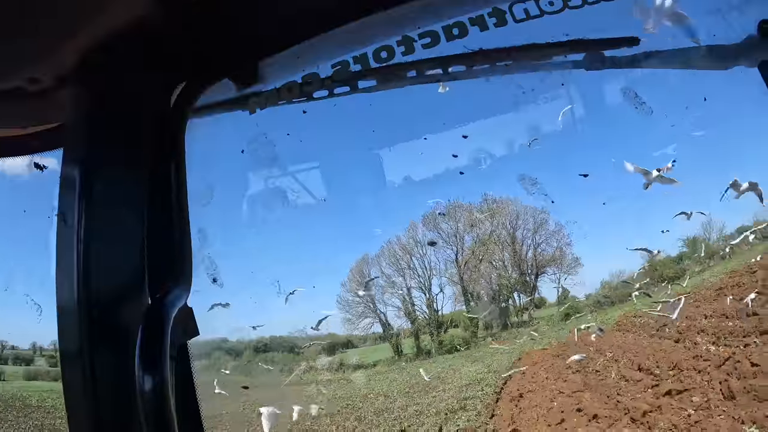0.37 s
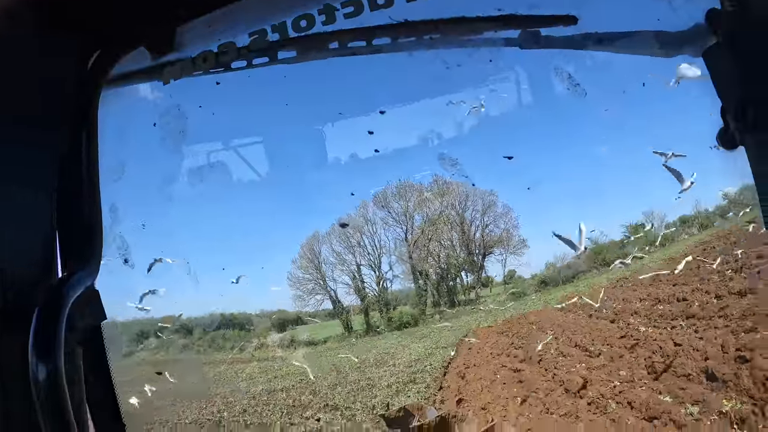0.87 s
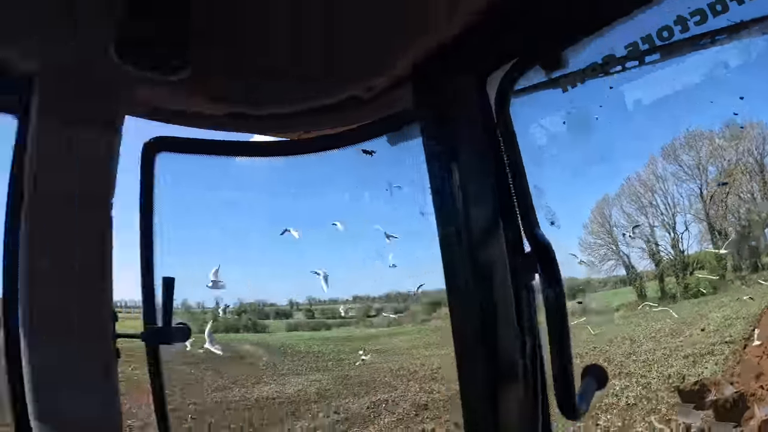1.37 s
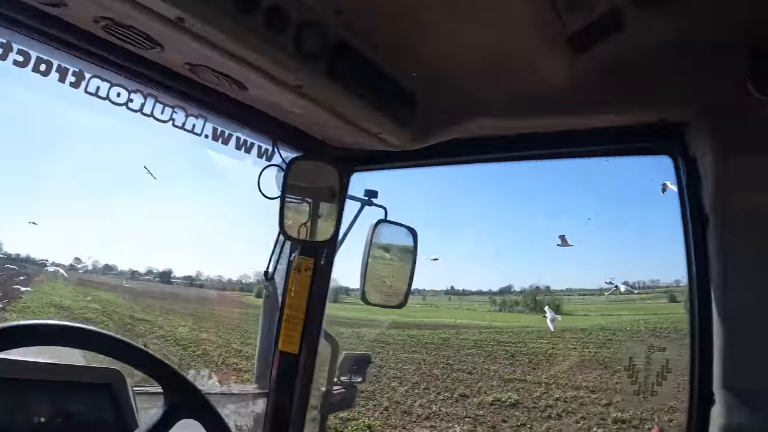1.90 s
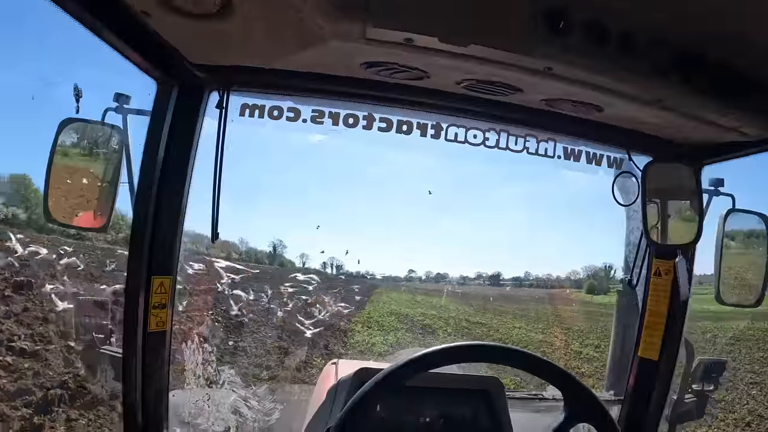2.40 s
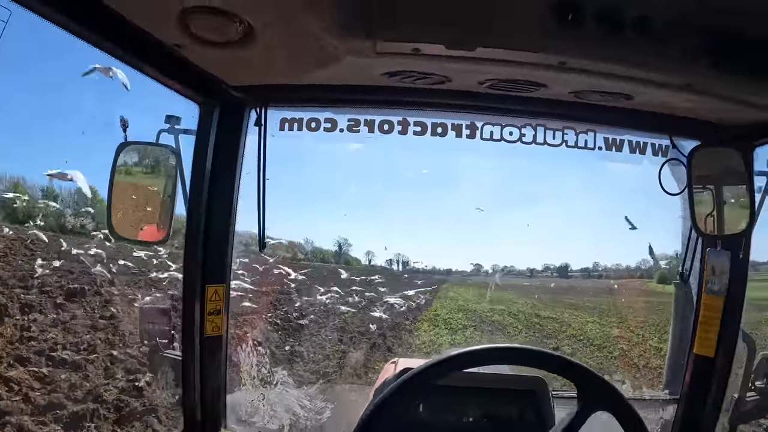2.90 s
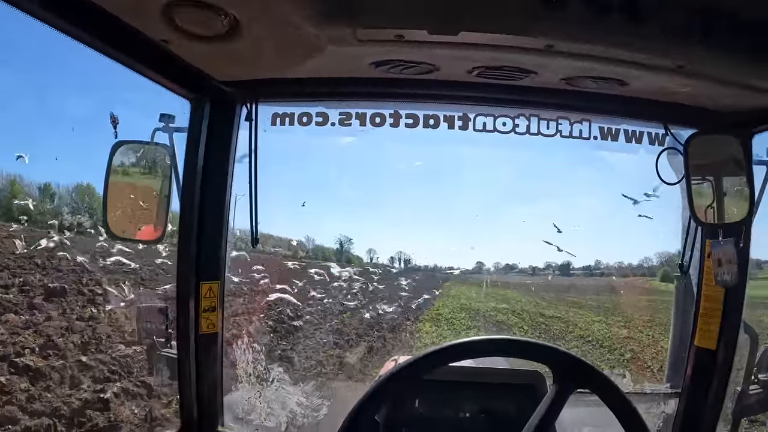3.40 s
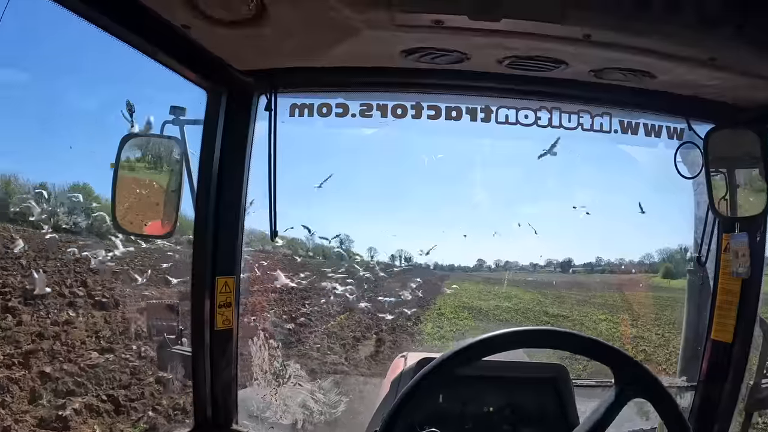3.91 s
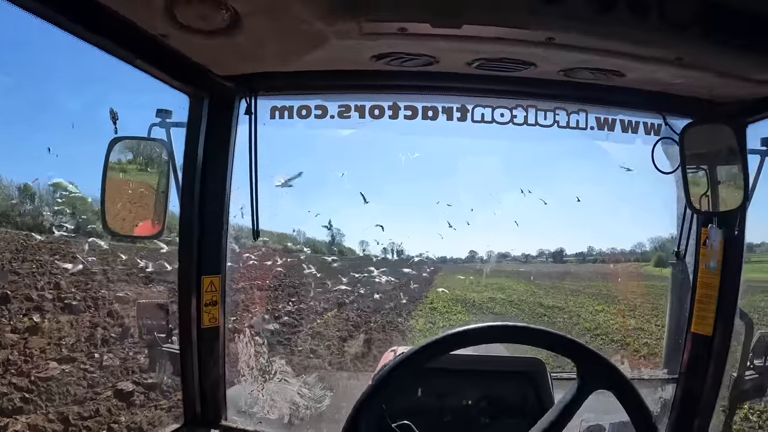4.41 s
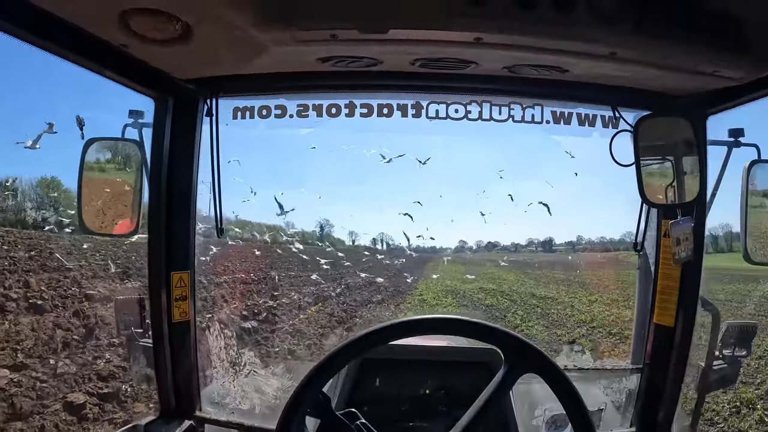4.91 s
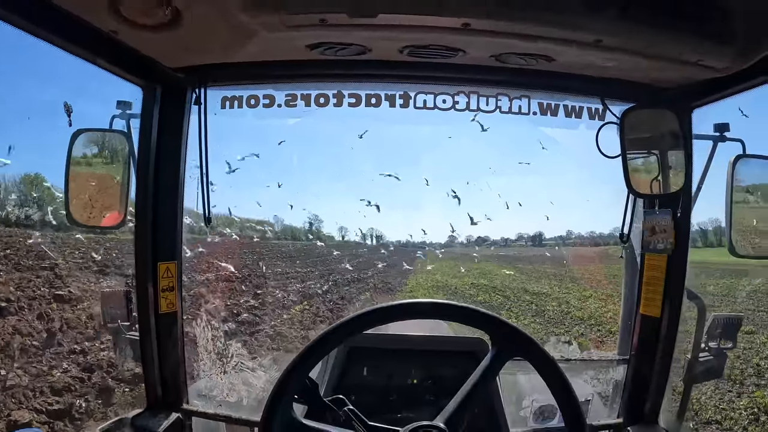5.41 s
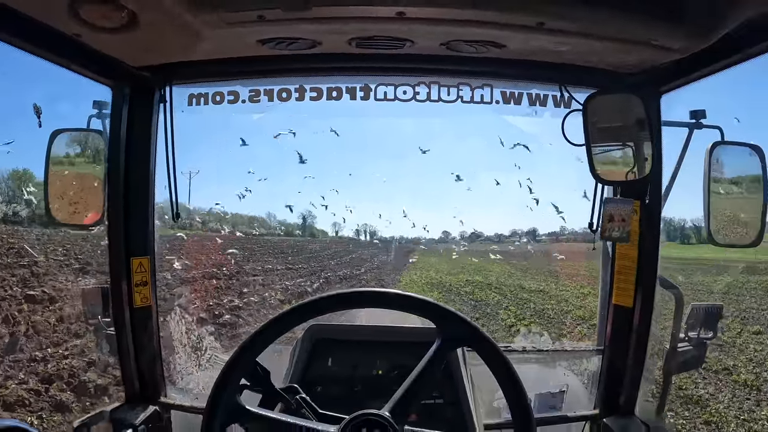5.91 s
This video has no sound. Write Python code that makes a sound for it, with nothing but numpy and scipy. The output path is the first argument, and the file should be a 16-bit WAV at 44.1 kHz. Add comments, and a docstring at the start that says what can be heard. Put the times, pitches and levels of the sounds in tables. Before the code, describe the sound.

A hand-held microphone in a vibrating tractor cab hears a continuous low engine hum from a six-cylinder diesel, thick with rough overtones. Facing rear first, it catches more mechanical clatter, whine and thin high hiss; turned forward, the treble and midrange soften while the boom stays. Irregular ticks of loose fittings and low jolting rumble over soil continue, and a short rough squeak ends the passage.

```python
"""Diesel tractor cab, ploughing.

A hand-held stereo microphone turns from the rear window to the windscreen of a six-cylinder tractor.
Sines locked to the engine cycle give the ruling firing boom, the engine orders and the gear and pump
whines; shaped noise gives the broad roar and a thin high hiss. Short notes make the clatter, cracks
with ringing modes the rattles of loose fittings, and a rough stack of sines one short squeak."""
import sys
import numpy as np
from scipy import signal
from scipy.fft import rfft, irfft
from scipy.io import wavfile
from scipy.ndimage import uniform_filter1d

SR = 44100
rng = np.random.default_rng(int(sys.argv[2]) if len(sys.argv) > 2 else 0)


def rack_gain(trim_db):
    """Turn a fader trim in dB into the linear factor to multiply a signal by."""
    fader = np.asarray(trim_db, float)
    return 10 ** (fader / 20)


def store_wav(level_fs):
    """Save 16-bit WAV to argv[1]."""
    pcm = np.round(np.clip(np.atleast_2d(level_fs), -1, 1) * 32767)
    wavfile.write(sys.argv[1], SR, pcm.T.astype(np.int16))


N = 266672
T = np.arange(N) / SR
FIRING_ORDER = 6  # firings per four-stroke cycle


def evened(x):
    """Scales to rms 1."""
    return x / np.sqrt(np.mean(x ** 2) + 1e-20)


def curve(rows, t=T):
    """Every column of a time table, read at times t."""
    s, *columns = np.transpose(rows)
    return [np.interp(t, s, c) for c in columns]


def read(rows, hz):
    """Every column of a frequency table, read on a log axis."""
    f, *columns = np.transpose(rows)
    return [np.interp(np.log(hz + 1), np.log(f + 1), c) for c in columns]


def wander(top_hz):
    """Chance of rms 1: sixteen sines up to top_hz, sampled every 2 ms."""
    s = np.arange(0, T[-1] + .01, .002)
    f = np.geomspace(top_hz / 20, top_hz, num=16)[:, None]
    sines = np.sin(2 * np.pi * (f * s + rng.random(f.shape)))
    return np.interp(T, s, evened(sines.sum(0)))


def wavers(rows):
    """Smooth swells and dips in dB; each row: centre in seconds, length in seconds, change in dB."""
    return sum(db * np.exp(-(2 * (T - s) / length) ** 2) for s, length, db in rows)


# Microphone turn. Each row: time in seconds, facing (0 rear window, 1 windscreen).
FACING = [(0, 0.031), (.6, 0.051), (1.2, 0.04), (1.5, 0.29), (1.8, 0.72), (2.1, 0.7), (2.6, 0.92),
          (3.7, 0.92), (4.2, 0.89), (5.4, 0.98), (6.05, 0.79)]


def facing(t=T):
    """Microphone direction, 0 rear to 1 front."""
    return curve(FACING, t)[0]


def turned(rear, front, share):
    """Blends a rear and a front value by the share of the turn made."""
    return rear + share * (front - rear)


# The governor hunts as the plough bites. Each row: time in seconds, engine speed in rpm, firing boom in dB.
DRIVE = [(0.0, 1462, -15.4), (0.42, 1486, -15.3), (0.72, 1447, -15.3), (1.22, 1471, -15.4),
         (1.5, 1449, -16.2), (1.78, 1478, -16.4), (2.1, 1444, -14.4), (2.45, 1452, -14.8),
         (2.7, 1473, -14.8), (2.9, 1468, -14.8), (3.17, 1488, -15.2), (3.45, 1462, -14.7),
         (3.72, 1455, -15.0), (3.9, 1466, -14.7), (4.1, 1463, -14.3), (4.7, 1497, -15.0),
         (5.1, 1469, -15.4), (5.4, 1496, -15.1), (5.6, 1484, -15.3), (5.82, 1499, -15.8),
         (6.05, 1482, -15.9)]


def cycle_count():
    """Four-stroke cycles completed: one for two turns of the crank."""
    rpm, _ = curve(DRIVE)
    return np.cumsum(rpm / 120) / SR


def overspeed_percent():
    """Engine speed above the usual one."""
    usual_rpm = 1470
    return 100 * (curve(DRIVE)[0] / usual_rpm - 1)


# The two microphone ports. Each row: frequency in Hz, likeness, left-right level in dB, left lead in radians.
PORTS = [(60, .996, .4, 0), (300, .95, .8, -.05), (550, .76, 1.7, -.22), (1100, .8, 1.8, -.34),
         (2200, .76, 1.6, -.52), (4500, .66, .6, -.38), (7500, .56, 1.9, -.02), (10000, .55, 1.1, -.02)]


def place(x, hz):
    """Pans a narrow sound near hz by the level difference of the ports."""
    _, pan_db, _ = read(PORTS, hz)
    return x * rack_gain([[pan_db / 2], [-pan_db / 2]])


def tone(cycles, order, db, flutter_db, slip_rad, chance_hz):
    """A sine locked to the engine cycle, its level and phase shaken by chance."""
    phase = 2 * np.pi * (order * cycles + rng.random()) + slip_rad * wander(chance_hz)
    x = np.sqrt(2) * rack_gain(db + flutter_db * wander(chance_hz)) * np.sin(phase)
    return place(x, order * cycles[-1] / T[-1])


# Roar colour. Each row: frequency in Hz, relative density in dB facing rear, facing front.
ROAR_COLOUR = [(20.1, -45, -40.5), (46, -52.5, -55.5), (90, -59.5, -54), (161, -51.5, -59),
               (254, -62.5, -59.5), (357, -62, -60), (565, -65, -65.5), (885, -58.5, -62),
               (1310, -63.5, -67.5), (1844, -63, -70), (2310, -73.5, -76), (2950, -77.5, -81.5),
               (3620, -80.5, -84), (5000, -82.5, -88.5), (7240, -86, -91.5), (8250, -96.5, -102),
               (9900, -102, -107), (10900, -111, -115)]
# Panel resonances and gaps. Each row: frequency in Hz, width in Hz, change in dB.
PANELS = [(277, 67, 2), (896, 33, 1), (811, 58, -6), (1516, 38, 2), (1660, 520, -2.5), (2226, 72, 4.5),
          (2900, 400, 4)]


def roar():
    """Block, fan and intake noise through the cab panels; at the bottom the chassis jolts over the soil."""
    gain_db, patch_db, bumps_db, bumps_hz, stroke_depth = .5, .88, 4.5, 2.5, .06
    frames, hz = N // 512 + 5, np.fft.rfftfreq(2048, 1 / SR)
    t = np.arange(frames) * 512 / SR
    a, b, c, d, patches = rng.standard_normal((frames, 1025, 5)).T
    patches = evened(uniform_filter1d(uniform_filter1d(patches, 20, 0), 5, 1))
    front = facing(t)
    # band levels before gain, patches and jolts
    roar_db = turned(-30, -33, front)
    bumps = np.interp(t, T, wander(bumps_hz))  # the rumble swells and sinks with the soil
    rumble_db = turned(-34.5, -30.5, front) + bumps_db * bumps

    column_hz = hz[:, None]
    rear_db, front_db = (v[:, None] for v in read(ROAR_COLOUR, hz))
    colour_db = turned(rear_db, front_db, front)
    colour_db += sum(db / (1 + (2 * (column_hz - f) / w) ** 2) for f, w, db in PANELS)
    colour_db -= 60 * (column_hz > 13150)  # the roar stops above 13 kHz
    mid, low = (hz > 400) & (hz < 7500), hz < 52
    # each band is levelled by the power in its reference part
    for band, part, db in ((~low, mid, roar_db), (low, low, rumble_db)):
        power = (rack_gain(colour_db[part]) ** 2).sum(0)
        colour_db[band] += db - 10 * np.log10(power)
    jolts = evened(uniform_filter1d(rng.standard_normal(frames), size=4))
    octaves_up = np.clip(np.log2(column_hz / 1500 + 1e-9), 0, 3)
    colour_db += .4 * jolts * octaves_up  # the whole treble flickers together

    same, pan_db, lead = (v[:, None] for v in read(PORTS, hz))
    left = a + 1j * b
    right = same * left + np.sqrt(1 - same ** 2) * (c + 1j * d)
    right = right * np.exp(-1j * lead)
    ports = np.array([left * rack_gain(pan_db / 2), right / rack_gain(pan_db / 2)])
    spectrum = ports * rack_gain(colour_db + patch_db * patches)
    noise = signal.istft(spectrum, nperseg=2048, noverlap=1536)[1][:, :N]
    strokes = 1 + stroke_depth * np.cos(2 * np.pi * FIRING_ORDER * cycle_count())
    return rack_gain(gain_db) * strokes * noise


def hiss():
    """A narrow fuzzy whistle of boosted air, mostly on the left: noise through a double pole."""
    centre_hz, pole_width_hz, right_cut_db, flutter_db = 12100, 490, 18.5, 1.5
    radius = np.exp(-np.pi * pole_width_hz / SR)
    z = rng.standard_normal((2, N)) + 1j * rng.standard_normal((2, N))
    z = signal.lfilter([1], [1, -2 * radius, radius ** 2], z)
    x = evened((z * np.exp(2j * np.pi * centre_hz * T)).real)
    db = turned(-60, -69, facing()) + flutter_db * wander(30)
    return x * rack_gain(db) * rack_gain([[0], [-right_cut_db]])


# Loose fittings. Each row: start in seconds, level in dB, left-right level in dB, ring level in dB,
# mode region struck in Hz.
RATTLES = [(.024, -51, 2.5, -1, 9400), (0.061, -47, 1.5, -5, 9400), (.095, -48.5, 2, -7, 5000),
           (.142, -44.5, 2.5, -1, 9400), (.355, -55, -0.5, 8, 3950), (1.05, -45, 0.5, 3, 3950),
           (1.153, -45.5, 0, -2, 10200), (1.22, -45.5, 2, -4, 9400), (1.36, -63, -4, 1, 3950),
           (1.5, -51, 1, 2, 3950), (2.026, -48, 5, -10, 9300), (2.059, -49, -1, -12, 9360),
           (2.163, -42, 5, -1, 6380), (3.068, -54.5, -2, -6, 7700), (3.689, -55, 3, -9, 7700),
           (3.733, -47, -2.5, -14, 5000), (3.888, -48, 0, -3, 5400), (4.01, -51.5, 8, -14, 7650),
           (4.379, -54, 3.5, -10, 7760), (5.529, -53.5, 2, -10, 9400)]
# Crack colour. Each row: frequency in Hz, level in dB.
CRACK = [(1000, -14), (3000, 1), (6000, 6.5), (9000, -6), (11000, -14.5), (13000, -13.5)]
# Fitting modes. Each row: frequency in Hz, 60 dB decay in seconds.
FITTING_MODES = [(3950, 0.26), (5000, .1), (5400, .12), (6380, 0.14), (7700, 0.082), (9400, 0.045),
                 (10150, 0.035)]


def rattles():
    """Each knock: a short crack of noise, and the modes nearest the struck spot ring on."""
    faint_per_s, faint_floor_db, crack_t60_s, onset_s = 8, -62, .11, .002
    t, out = np.arange(4096) / SR, np.zeros((2, N + 4096))
    colour = rack_gain(read(CRACK, np.fft.rfftfreq(4096, 1 / SR))[0])
    # the many knocks too small to point at
    u = rng.random((int(faint_per_s * T[-1]), 4)).T
    faint = np.c_[u[0] * T[-1], faint_floor_db + 7 * u[1], 3 * u[2], 6 * u[2] - 12, 3600 * 2.2 ** u[3]]
    for s, db, pan_db, ring_db, spot_hz in [*RATTLES, *faint]:
        noise = irfft(rfft(rng.standard_normal((2, 4096))) * colour)
        crack = evened(noise) * rack_gain(-60 * t / crack_t60_s)
        crack += 0.57 * crack[::-1]  # the two ports share part of each crack
        ring = 0
        for hz, t60_s in FITTING_MODES:
            mode_db = ring_db - 64 * abs(np.log2(hz / spot_hz)) - 60 * t / t60_s
            ring = ring + rack_gain(mode_db) * np.sin(2 * np.pi * hz * t)
        knock = rack_gain(db) * (0.9 * crack + ring) * (1 - np.exp(-t / onset_s))
        out[:, round(s * SR):][:, :4096] += knock * rack_gain([[pan_db / 2], [-pan_db / 2]])
    return out[:, :N]


# Each row: time in seconds, pitch in Hz, force in dB.
SQUEAK = [(5.9, 975, -48), (5.912, 980, -29), (5.93, 970, -26), (5.945, 960, -27), (5.972, 955, -31),
          (5.988, 950, -48)]
# Each row: multiple of the pitch, level in dB at full force.
SQUEAK_STACK = [(1, -2), (2, -10.5), (3, -18), (3.5, -17), (4, -21), (5, -26), (5.5, -25)]


def squeak():
    """A rubbing joint sticks and slips for a moment: a rough stack, brightest at full force."""
    pitch_shake, scrape_share, flutter_db = .03, .3, 1.3
    hz, db = curve(SQUEAK)
    turns = np.cumsum(hz * (1 + pitch_shake * wander(300))) / SR
    weak_db = db - db.max()
    stack = sum(rack_gain(k_db + (k - 1) * weak_db) * np.sin(2 * np.pi * k * turns) for k, k_db in SQUEAK_STACK)
    scrape = evened(signal.oaconvolve(rng.standard_normal(N), np.hanning(120), "same"))
    stack *= 1 + scrape_share * scrape
    on = uniform_filter1d(1. * (T > SQUEAK[0][0]) * (T < SQUEAK[-1][0]), size=200)
    return place(np.sqrt(2) * rack_gain(db + flutter_db * wander(200)) * stack * on, 1000)


# Loudest knocks. Each row: start in seconds, frequency in Hz, level in dB, length in cycles.
KNOCKS = [(.42, 1240, -27, 40), (.67, 1335, -28.5, 32), (.71, 784, -22.5, 18), (.94, 996, -36, 28)]


def clatter():
    """Linkage and valve gear knock the floor panels, louder to the rear: short dull windowed sines."""
    per_s, base_db, knock_pan_db = 30, -38, 1.8
    t, out = np.arange(2048) / SR, np.zeros((2, N + 2048))
    u = rng.random((int(per_s * T[-1]), 5)).T
    s, hz = u[0] * T[-1], 620 * 3.4 ** (u[1] ** 1.41)
    db = base_db - 4 * facing(s) - 0.57 * np.log(u[2] + .03) - 6 * np.log2(hz / 800)
    small = np.c_[s, hz, db, 10 + 12 * u[3], 10 * u[4] - 3]
    loud = [(*row, knock_pan_db) for row in KNOCKS]
    for s, hz, db, turns, pan_db in [*small, *loud]:
        window = np.sin(np.pi * np.minimum(t * hz / turns, 1)) ** 2
        note = rack_gain(db) * np.sin(2 * np.pi * hz * t) * window
        out[:, round(s * SR):][:, :2048] += note * rack_gain([[pan_db / 2], [-pan_db / 2]])
    return out[:, :N]


# Orders of the engine cycle.
PUMP_ORDERS = (38.33, 108, 122, 252.5, 364)
# Each row, one a pump order: level in dB facing rear, facing front.
PUMPS = [(-49, -62), (-61.5, -54), (-68, -50), (-61.5, -66), (-58.5, -79.5)]


def pump_whines():
    """Faint fluttering whines at fixed multiples of the engine cycle."""
    cycles, front, out = cycle_count(), facing(), 0
    for order, (rear_db, front_db) in zip(PUMP_ORDERS, PUMPS):
        db = turned(rear_db, front_db, front)
        out = out + tone(cycles, order, db, flutter_db=3.5, slip_rad=0.91, chance_hz=30)
    return out


# Orders of the engine cycle.
GEAR_ORDERS = (63.17, 76.6, 143.4, 152.1)
# Each row, one a gear order: nominal level in dB facing rear, facing front, dB per % over the usual speed.
GEARS = [(-45, -44.5, -0.9), (-38.5, -43.5, -.5), (-44.5, -56.5, 0), (-47.5, -55.5, 0)]
# Flutter in dB, one a gear order.
GEAR_ROUGH_DB = (1.8, 3.4, 2.2, 3)
# One list a gear order. Each row: centre in seconds, length in seconds, change in dB.
GEAR_WAVERS = [
    [(.3, .5, 3), (1.87, 0.15, 10), (2.5, .8, -4), (4.25, .25, -5), (4.65, .6, 5.5), (5.1, 0.35, 4.5),
     (5.7, 1.1, 8)],
    [(1.9, 0.96, 2.5), (2.8, .5, -10.5)],
    [(.4, 0.28, -11), (.8, .5, 7), (1.55, .4, 8)],
    [(.45, 0.37, 8.5), (.95, 0.27, 10), (2.95, .5, 8), (5.7, 0.63, 12)],
]


def gear_whines():
    """Tooth mesh whines at fixed multiples of the engine cycle, rough and wavering."""
    drift_db, drift_hz = .8, 3  # slow coming and going as the microphone sways
    cycles, front, over, out = cycle_count(), facing(), overspeed_percent(), 0
    for order, row, rough_db, rows in zip(GEAR_ORDERS, GEARS, GEAR_ROUGH_DB, GEAR_WAVERS):
        rear_db, front_db, speed_db = row
        db = turned(rear_db, front_db, front) + speed_db * over
        db += wavers(rows) + drift_db * wander(drift_hz) - rough_db / 2
        out = out + tone(cycles, order, db, flutter_db=rough_db, slip_rad=rough_db / 4, chance_hz=70)
    return out


# Orders of the engine cycle.
WEAK_ORDERS = (1, 2, 3, 4, 5, 7, 8, 9, 10, 11, 13, 14, 16, 17, 19, 22, 23, 24, 25, 26, 27, 28, 29)
# Each row, one a weak order: level in dB facing rear, facing front.
WEAK = [(-49, -45), (-37, -30.5), (-34, -40.5), (-37.5, -33), (-43.5, -40), (-49, -46.5), (-37, -46),
        (-38, -39), (-35.5, -44), (-40.5, -45.5), (-47.5, -55.5), (-39.5, -39.5), (-43, -63),
        (-53.5, -55.5), (-54, -61), (-43, -45.5), (-47, -43), (-41.5, -43), (-47.5, -57.5), (-52, -65),
        (-58.5, -66), (-57.5, -52), (-49.5, -50)]


def weak_orders():
    """Unequal cylinders fill in the other orders of the four-stroke cycle."""
    cycles, front, out = cycle_count(), facing(), 0
    for order, (rear_db, front_db) in zip(WEAK_ORDERS, WEAK):
        db = turned(rear_db, front_db, front)
        out = out + tone(cycles, order, db, flutter_db=1.5, slip_rad=0.44, chance_hz=5)
    return out


# Orders of the engine cycle.
STRONG_ORDERS = (12, 15, 18, 20, 21, 30)
# Each row, one a strong order: level in dB facing rear, facing front, facing at the change,
# dB per % over the usual speed.
STRONG = [(-28, -39, 0.83, 0), (-32.5, -53.5, .6, -0.5), (-34.5, -41.5, 0.6, 1.8), (-37, -34.5, 0.44, 0),
          (-40, -33, 0.42, -.5), (-47.5, -39, 0.26, 1)]
# One list a strong order. Each row: centre in seconds, length in seconds, change in dB.
STRONG_WAVERS = [
    [(3.8, 0.28, 0.5), (4.25, 0.45, 1), (5.35, 0.44, -13.5)],
    [(1.5, .3, 2.5), (2.9, .7, -4), (4.35, .4, -5), (5.6, 0.78, -2.5)],
    [(2.3, .5, -6), (3.9, 0.7, -7)],
    [(.35, 0.34, -12.5), (1.45, 0.41, -7.5), (5.4, 0.21, 2)],
    [(.75, 0.91, -8), (3.25, 0.7, -11.5), (5.15, 0.77, -2.5), (5.95, 0.52, 4.5)],
    [(.95, 0.35, -7), (3.3, 0.19, 5.5), (3.65, .25, 2.5), (4.6, .9, 3), (5.3, 0.35, -2),
     (5.95, 0.16, -11.5)],
]


def strong_orders():
    """Orders that the cab's air modes lift; each changes over a small share of the turn."""
    change_width = 0.083  # share of the turn
    drift_db, drift_hz = .6, 3  # slow coming and going as the microphone sways
    cycles, front, over, out = cycle_count(), facing(), overspeed_percent(), 0
    for order, row, rows in zip(STRONG_ORDERS, STRONG, STRONG_WAVERS):
        rear_db, front_db, change, speed_db = row
        share = 1 / (1 + np.exp((change - front) / change_width))
        db = turned(rear_db, front_db, share) + speed_db * over
        db += wavers(rows) + drift_db * wander(drift_hz)
        out = out + tone(cycles, order, db, flutter_db=1, slip_rad=.25, chance_hz=10)
    return out


# Left-right level added to the boom, in dB: facing rear, facing front.
BOOM_PAN_DB = (-0.47, 0.2)


def firing_boom():
    """Even firing of six cylinders: a sine at the firing order, leaning sideways as the microphone turns."""
    _, boom_db = curve(DRIVE)
    boom = tone(cycle_count(), FIRING_ORDER, boom_db, flutter_db=.1, slip_rad=.03, chance_hz=20)
    lean = rack_gain(turned(*BOOM_PAN_DB, facing()) / 2)
    return boom * np.array([lean, 1 / lean])


def scene():
    """All sources in the cab."""
    background = roar() + hiss() + rattles() + squeak() + clatter()
    whines = pump_whines() + gear_whines()
    return background + whines + weak_orders() + strong_orders() + firing_boom()


def low_pass(x):
    """Removes everything above the highest recorded frequency."""
    return signal.sosfilt(signal.butter(12, 12830, fs=SR, output="sos"), x)


def record(dry):
    """Delivers the finished mix."""
    return low_pass(dry)


dry = scene()
out = record(dry)
store_wav(out)
```